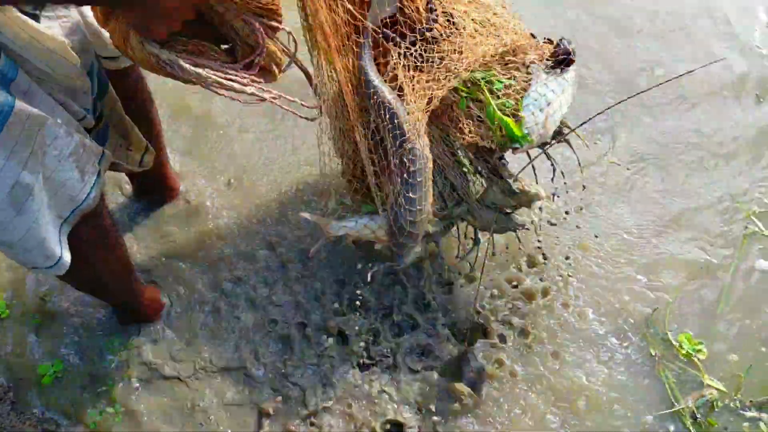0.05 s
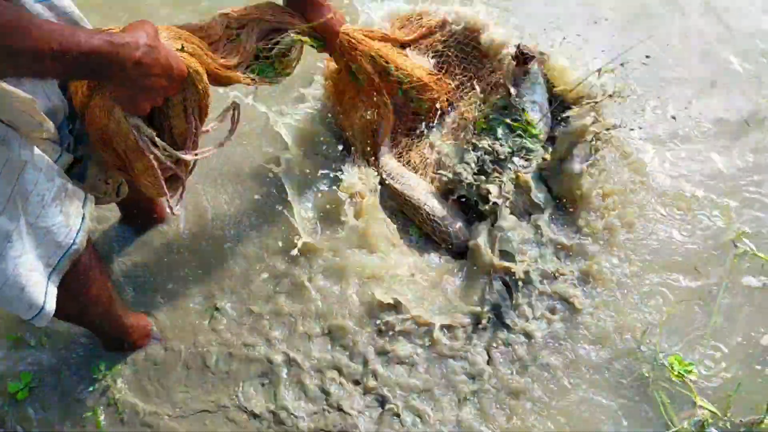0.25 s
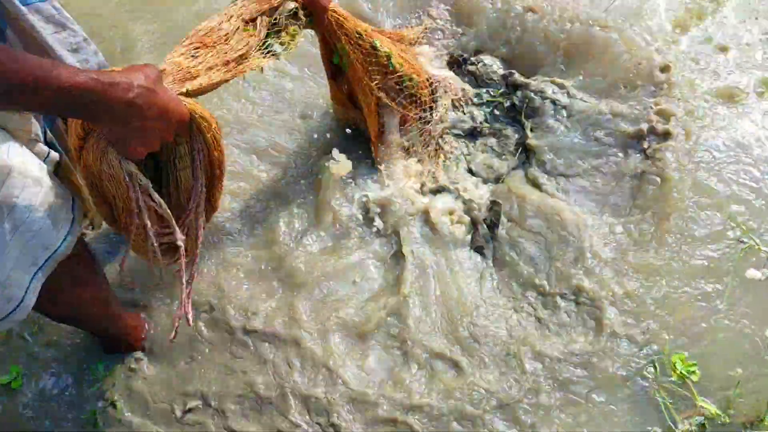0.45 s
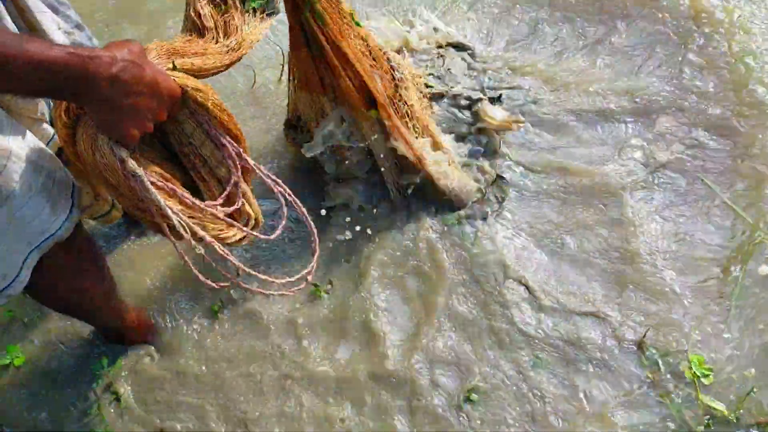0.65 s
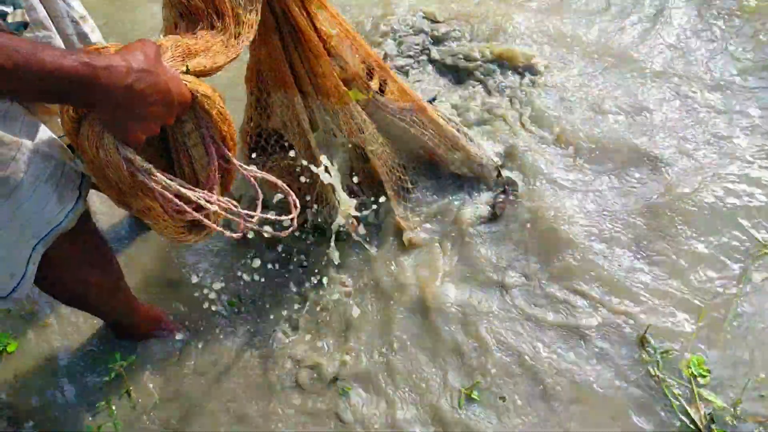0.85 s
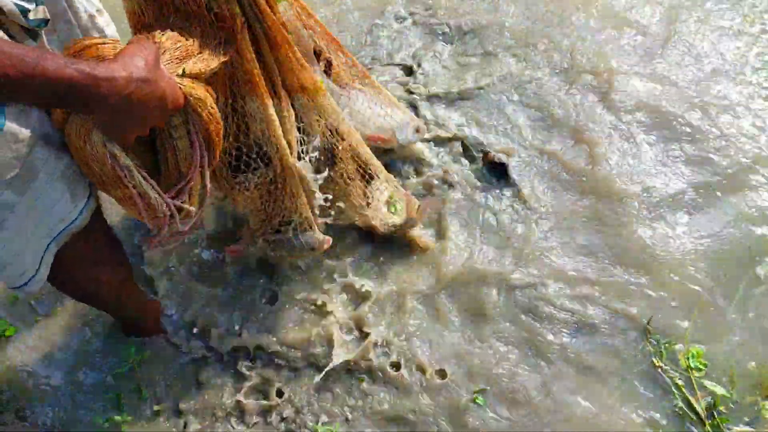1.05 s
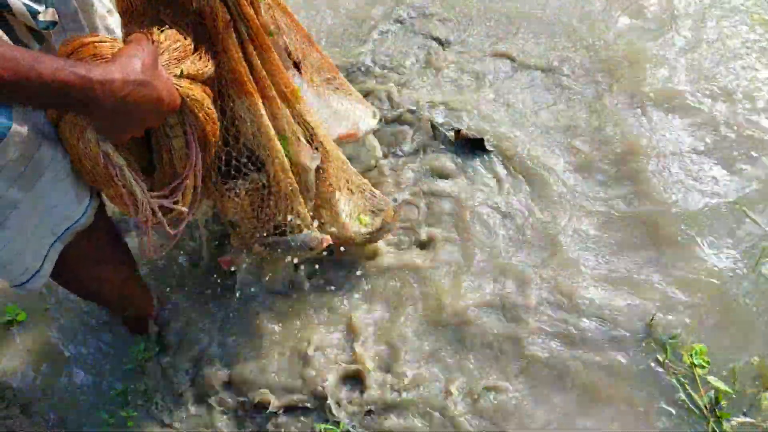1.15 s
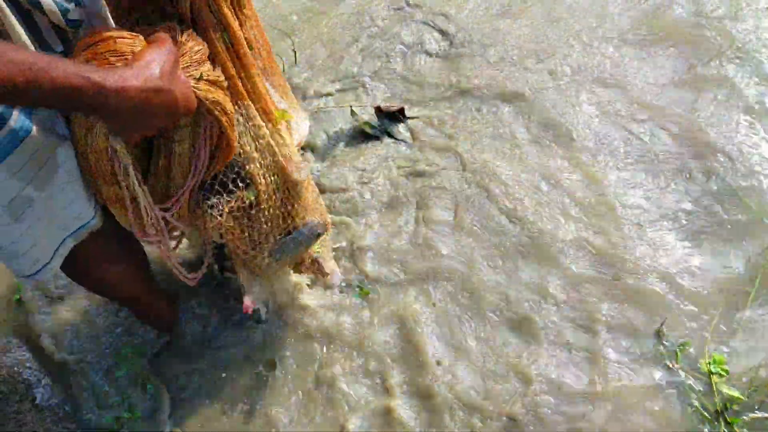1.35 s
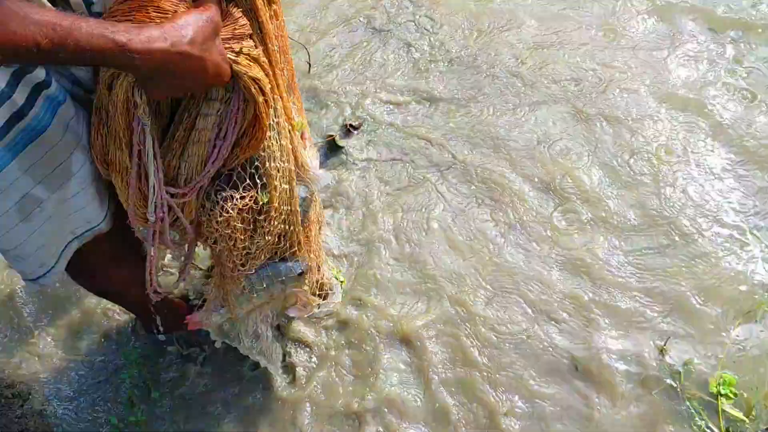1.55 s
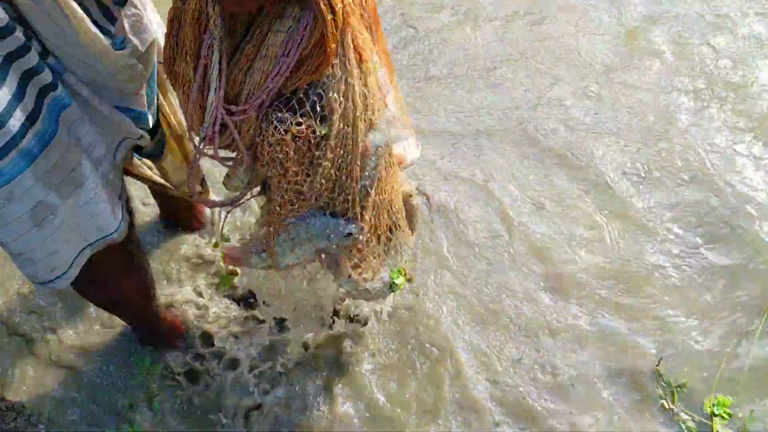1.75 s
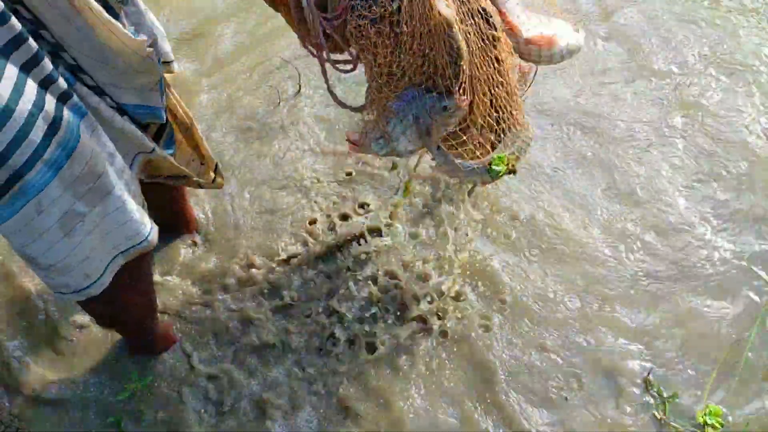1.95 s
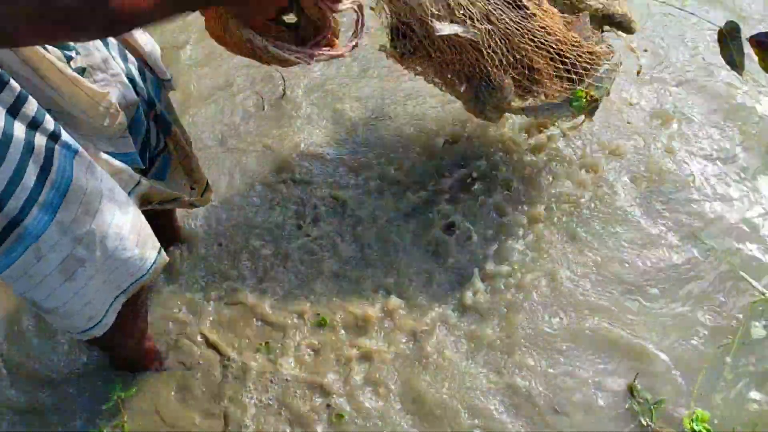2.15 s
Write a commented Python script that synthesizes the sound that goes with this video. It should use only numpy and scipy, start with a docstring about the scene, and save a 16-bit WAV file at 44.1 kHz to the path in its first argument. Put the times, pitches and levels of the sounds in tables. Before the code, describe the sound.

Water splashes as a bundled net is dunked into a muddy shallow, bubbling and plopping. A second slosh follows, then softer swishing and a light patter of drips as the net lifts out, close by outdoors.

```python
"""Dunking a fishing net

A bundled net is dunked in shallow muddy water, pushed down again, swished and lifted out dripping.
Each surge of water traps air bubbles that ring briefly, and throws a spray of tiny drops.
Single plops and sharp splats stand out, foam fizzes, and a thin hiss comes and goes as the net
drains. It all happens outdoors, close by."""
import sys
import numpy as np
from scipy import signal
from scipy.io import wavfile

SR = 44100
rng = np.random.default_rng(int(sys.argv[2]) if len(sys.argv) > 2 else 0)


def bounce(signal):
    """Save signal as a 16-bit WAV file at the path given by the first command-line argument."""
    frames = np.transpose(np.atleast_2d(signal))
    limited = np.clip(frames, -1, 1)
    pcm = np.round(limited * 32767).astype(np.int16)
    wavfile.write(sys.argv[1], SR, pcm)


N = 97020  # 2.2 seconds


def amp(db):
    """Turns decibels (dB) into a number to multiply a sound by."""
    return 10 ** (np.asarray(db) / 20)


def unit(x):
    """Scales a sound to an average power of 1."""
    return x / np.sqrt(np.mean(x ** 2) + 1e-20)


def add(mix, start_s, sound):
    """Adds a sound to the mix at the given time."""
    part = mix[max(round(start_s * SR), 0):][:len(sound)]
    part += sound[:len(part)]


def colour(x, tone, size=4096):
    """Makes some pitches louder and others softer, following rows of Hz and dB."""
    hz, db = np.transpose(tone)
    log_hz = np.log(abs(np.fft.fftfreq(size, 1 / SR)) + 1)
    log_gain = np.log(amp(np.interp(log_hz, np.log(hz), db)))
    response = np.exp(np.conj(signal.hilbert(log_gain)))  # rings after a click, never before it
    taps = np.fft.ifft(response).real[:size // 2]
    return signal.fftconvolve(x, taps)[:len(x)]


def evened(x, smooth_s=0.022):
    """Holds a sound's strength near 1 while keeping its fine crackle."""
    window = np.hanning(int(2 * smooth_s * SR))
    power = abs(signal.fftconvolve(x ** 2, window / window.sum(), "same"))
    return x / np.sqrt(power + 0.03 * np.median(power) + 1e-12)


def grains(level, per_s, spread_db, reference_db=-57.5):
    """Random clicks: per_s a second when the level is at reference_db, more in wilder water."""
    chance, size = rng.random(N), rng.exponential(1, N)
    rate = per_s * (level / amp(reference_db)) ** 0.32
    return (chance < rate / SR) * amp(spread_db * np.minimum(size, 4))


def crackle(level, tone, per_s, spread_db):
    """Random clicks, coloured and evened out; the level sets how crowded they are."""
    clicks = grains(level, per_s, spread_db) * rng.choice([-1, 1], N)
    return evened(colour(clicks, tone))


def bubble(hz, cycles, onset_cycles, glide):
    """One air bubble swells and rings away, rising in pitch as it nears the surface."""
    turns = np.arange(int(8 * cycles * SR / hz)) * hz / SR
    shape = (1 - np.exp(-(turns / onset_cycles) ** 2)) * np.exp(-turns / cycles)
    bend = 1 + glide * (turns / cycles / 2 - 0.5)
    return shape / shape.max() * np.sin(2 * np.pi * turns * bend)


def swarm(level, tone, range_hz, per_s, spread_db, cycles, kinds=128):
    """Many bubbles, each ringing at the pitch that its size gives it."""
    strengths = grains(level, per_s, spread_db)
    kind = rng.integers(0, kinds, N)
    pitches = np.geomspace(*range_hz, kinds) * rng.uniform(0.98, 1.02, kinds)
    ring_cycles = cycles * np.exp(0.18 * rng.standard_normal(kinds))
    rings = [bubble(hz, c, onset_cycles=0.63, glide=0.019) for hz, c in zip(pitches, ring_cycles)]
    out = np.zeros(N)
    for i in np.flatnonzero(strengths):
        add(out, i / SR, strengths[i] * rings[kind[i]])
    return level * evened(colour(out, tone))


def air():
    """Still outdoor air makes a very faint, steady noise."""
    # The air's tone. Each row: pitch in Hz, boost or cut in dB.
    tone = [(25, 1), (90, 0.5), (170, -9), (400, -15), (1000, -12.5), (2100, 5.5), (4500, -18.5),
            (9000, -13), (15500, -24.5)]
    return amp(-84.5) * unit(colour(rng.standard_normal(N), tone))


def echoes(x, fade_s=0.082, change_s=0.06, size=8192, count=3):
    """Short echoes off the water, the bank and the fisherman keep changing as the water moves."""
    t, out = np.arange(size) / SR, np.zeros(N)
    for k in range(count):
        bounces = rng.standard_normal(size) * (rng.random(size) < 2000 / SR)  # about 2000 a second
        bounces *= amp(-60 * t / fade_s)
        share = np.sqrt(2 / count) * np.cos(np.pi * (np.arange(N) / SR / change_s + k / count))
        out += signal.fftconvolve(x * share, bounces / np.linalg.norm(bounces))[:N]
    return out


def fizz():
    """Foam bursts on the wet net in a dense, quiet, very high fizz."""
    # How loud the foam is. Each row: time in seconds, level in dB.
    loudness = [(0, -86.5), (0.151, -70), (.55, -69), (.67, -107), (.74, -82), (.84, -72.5), (0.981, -100),
                (1.069, -80.5), (1.22, -83), (1.35, -73), (1.439, -101), (1.48, -75.5), (1.63, -93),
                (1.701, -72), (2.051, -65), (2.2, -78.5)]
    # The foam's tone. Each row: pitch in Hz, boost or cut in dB.
    tone = [(3000, -38), (6500, -19.5), (7600, -9.5), (8600, 1), (10000, -6), (12000, -3), (14300, -1.5),
            (15500, -4.5)]
    times, db = np.transpose(loudness)
    level = amp(np.interp(np.arange(N) / SR, times, db))
    return level * crackle(np.ones(N), tone, per_s=560, spread_db=5.5)


def churn():
    """Water pushed aside makes deep lumps of sound with no clear note."""
    # Swells of churning. Each row: start in seconds, length in seconds, level in dB.
    swells = [(.25, 0.17, -69), (0.396, 0.076, -59.5), (0.478, 0.078, -75.5), (0.619, .025, -75.5),
              (0.706, 0.033, -79.5)]
    # The churning's tone. Each row: pitch in Hz, boost or cut in dB.
    tone = [(25, -20.5), (80, -14.5), (150, -18.5), (240, -12), (340, -8), (450, -5.5), (600, -2),
            (1200, -27)]
    t, level = np.arange(N) / SR, np.zeros(N)
    for start, length, db in swells:
        progress = np.clip((t - start) / length, 0, 1)
        level += amp(db) * abs(np.sin(np.pi * progress))
    return level * crackle(np.ones(N), tone, per_s=83, spread_db=1)


def hiss(width_hz=650):
    """A thin hiss wanders in pitch and swells as the net leaves the water."""
    # The path of the hiss. Each row: time in seconds, middle pitch in Hz, level in dB.
    path = [(.63, 6200, -100), (.685, 5920, -69.5), (0.721, 6220, -100), (1.345, 5820, -105),
            (1.367, 5780, -67), (1.431, 5930, -81.5), (1.489, 6050, -68.5), (1.575, 6080, -95.5),
            (1.60, 6000, -68), (1.64, 6200, -73.5), (1.663, 6397, -56), (1.71, 6240, -52),
            (1.801, 6220, -60.5), (1.991, 6170, -64.5), (2.079, 6250, -94)]
    times, hz, db = np.transpose(path)
    t = np.arange(N) / SR
    low_pass = signal.butter(3, width_hz / 2, fs=SR, output="sos")
    noise = signal.sosfilt(low_pass, rng.standard_normal((2, N)))
    phase = 2 * np.pi * np.cumsum(np.interp(t, times, hz)) / SR
    band = noise[0] * np.cos(phase) + noise[1] * np.sin(phase)  # moves the low noise up to that pitch
    return amp(np.interp(t, times, db)) * unit(band)


def surge_levels():
    """Each surge of water rises, holds and fades, driving three sizes of bubble and the spray."""
    # Surges of water. Each row: start, rise and hold in seconds, fade in dB a second,
    # then levels in dB for big bubbles, small bubbles, fine bubbles and spray.
    # The net hits at 0.24 s, the hollow closes at 0.4 s, a second push comes at 0.72 s,
    # the net swishes at 1.25 s and lifts clear at 1.65 s.
    surges = [ (.0, 0.0024, 0.28, 206, -87.5, -75.5, -72, -75),
              (0.109, 0.002, 0.0027, 369, -79, -55.5, -56, -58),
              (0.21, 0.0056, 0.0094, 306, -82, -50.5, -46, -49),
              (0.239, 0.021, 0.034, 141.5, -36.5, -30.5, -36, -39.5),
              (0.398, 0.0034, 0.071, 194, -46, -43.5, -52.5, -66),
              (0.494, 0.0035, 0.017, 134.5, -69, -45.5, -54, -63.5),
              (0.644, 0.016, 0.016, 312, -64, -61, -87.5, -100),
              (0.693, 0.012, 0.0067, 214, -62.5, -43.5, -57, -72),
              (0.716, 0.022, 0.06, 206.5, -54.5, -43.5, -55, -70.5),
              (0.91, 0.0024, 0.0015, 404, -67, -55, -74.5, -84.5),
              (0.993, 0.014, 0.044, 164, -84.5, -78.5, -95.5, -108.5),
              (1.056, 0.0037, .11, 70.5, -70, -65.5, -83, -75),
              (1.109, 0.0031, 0.0089, 263, -93, -56.5, -65, -56.5),
              (1.245, 0.014, 0.061, 157, -74.5, -64, -115, -83),
              (1.362, 0.018, 0.02, 121.5, -75, -62.5, -88, -117.5),
              (1.486, .005, 0.011, 70.5, -79.5, -70, -81.5, -77),
              (1.577, 0.027, 0.026, 102.5, -95.5, -83, -76, -83.5),
              (1.653, 0.054, 0.029, 110, -102.5, -74, -73, -57.5),
              (1.740, 0.033, 0.11, 129.5, -78.5, -62.5, -64.5, -60),
              (1.96, 0.0073, 0.028, 85.5, -83, -64, -67.5, -58),
              (2.129, 0.0027, 0.025, 197, -100, -79, -66, -69)]
    t, levels = np.arange(N) / SR, np.zeros((4, N))
    slowness = np.array([1.88, 1, 1, 1])[:, None]  # big bubbles take longer to build up
    for start, rise, hold, fade, *dbs in surges:
        swell = np.clip((t - start) / (rise * slowness), 0, 1) ** slowness
        shape = swell * amp(-fade * np.maximum(t - start - rise - hold, 0))
        levels += (amp(dbs)[:, None] * shape) ** 2
    return np.sqrt(levels)


def spray(level):
    """Tiny drops tick on the water and ring at many high pitches."""
    # The spray's tone. Each row: pitch in Hz, boost or cut in dB.
    tone = [(300, -40.5), (1500, -20.5), (3700, -9), (4600, -21.5), (6100, -7.5), (7300, -10.5),
            (7900, -10.5), (8450, 2), (9100, -1), (9800, -2), (10800, -6), (12000, -11.5), (14000, -8),
            (15500, -9.5)]
    ticks = level * crackle(level, tone, per_s=1700, spread_db=0.5)
    rings = swarm(level, tone, (4940, 14370), per_s=1100, spread_db=1.5, cycles=15)
    return amp(-4.5) * ticks + rings


def splats(rise_s=0.001, decay_s=0.002, size=1024):
    """Large drops land flat and burst into a brief crack of spray."""
    # Drops landing. Each row: start in seconds, peak level in dB.
    landings = [(0.221, -32), (0.263, -21), (0.343, -51), (.521, -44.5), (.791, -36.5), (1.012, -71),
                (1.583, -55), (1.697, -41), (1.789, -33), (1.903, -43), (1.9979, -31.5), (2.036, -37.5),
                (2.098, -41.5)]
    # A splat's tone. Each row: pitch in Hz, boost or cut in dB.
    tone = [(500, -39), (2500, -20.5), (4000, -15.5), (6200, -8), (7400, -26.5), (8600, 12.5), (9600, -0.5),
            (11000, -10), (15500, -8)]
    t, out = np.arange(size) / SR, np.zeros(N)
    shape = (1 - np.exp(-(t / rise_s) ** 2)) * np.exp(-t / decay_s)
    for start, db in landings:
        crack = colour(rng.standard_normal(size) * shape, tone)
        add(out, start, amp(db) * crack / abs(crack).max())
    return out


def bubbling(big, small, fine):
    """Air trapped by the surges rings in three swarms: the smaller the bubbles, the higher the pitch."""
    # The tones of the three swarms. Each row: pitch in Hz, boost or cut in dB.
    big_tone = [(60, -38.5), (180, -39), (260, -24), (400, -14.5), (500, -15.5), (610, -4), (780, -5),
                (950, 5.5), (1160, 10), (1450, 7), (2200, -13), (4000, -42)]
    small_tone = [(300, -41.5), (900, -10), (1400, -9), (1700, -6.5), (2000, 3), (2300, 3.5), (2600, -2),
                  (2850, -8), (3200, -18.5), (4400, -28), (9000, -50.5)]
    fine_tone = [(500, -38.5), (2000, -11), (2800, -3), (3700, -2), (4400, -13), (5500, -12.5), (9000, -31)]
    return (swarm(big, big_tone, (473.6, 1483), per_s=1100, spread_db=4.5, cycles=2.9)
            + swarm(small, small_tone, (1388, 2840), per_s=1100, spread_db=3.5, cycles=5)
            + swarm(fine, fine_tone, (2627, 5420), per_s=920, spread_db=3, cycles=7.2))


def plops(low_cut_hz=500):
    """Single bubbles ring loudly enough to stand out from the swarms."""
    # Single bubbles. Each row: start in seconds, peak in dB before the bass is cut, pitch in Hz.
    loud_bubbles = [(0.011, -45.5, 2164), (.059, -50, 2080), (0.078, -48.5, 2090), (.115, -58.5, 863),
                    (.118, -42.5, 2175), (0.123, -48.5, 1345), (0.206, -52.5, 1260), (.213, -29, 2510),
                    (.237, -30, 2460), (.254, -26.5, 2000), (.275, -22.5, 2226), (.284, -25, 1984),
                    (0.295, -31, 1196), (.304, -53, 2390), (.316, -19.5, 1940), (.339, -25.5, 2430),
                    (.408, -27.5, 2024), (.409, -35.5, 1060), (.456, -36, 1205), (0.551, -40, 3300),
                    (.625, -42.5, 2360), (0.702, -30.5, 2034), (.733, -25.5, 1980), (0.735, -28.5, 2610),
                    (0.762, -31, 1490), (.781, -40, 954), (.782, -59, 2100), (.789, -31, 2014),
                    (0.92, -42, 1890), (0.98, -61.5, 1747), (1.064, -66.5, 616), (1.077, -48, 1920),
                    (1.129, -47.5, 3040), (1.150, -68, 580), (1.18, -59.5, 1226), (1.244, -48.5, 2140),
                    (1.272, -45.5, 1890), (1.295, -46, 2080), (1.316, -45.5, 2040), (1.346, -37.5, 2058),
                    (1.431, -61, 1204), (1.490, -52.5, 1840), (1.612, -65, 2700), (1.746, -45, 2210),
                    (1.772, -45, 1897), (1.814, -52, 1124), (1.821, -47, 1496), (1.840, -64, 3040),
                    (1.858, -47.5, 2080), (1.873, -45.5, 1890), (1.913, -58, 1250), (1.945, -63, 980),
                    (1.984, -41.5, 2266), (2.008, -60, 855), (2.02, -50.5, 1267), (2.035, -42.5, 2446),
                    (2.076, -59.5, 1645), (2.143, -46, 3410), (2.161, -51, 2650)]
    out = np.zeros(N)
    for start, db, hz in loud_bubbles:
        add(out, start, amp(db) * bubble(hz, cycles=5, onset_cycles=1.8, glide=0.03))
    return signal.sosfilt(signal.butter(2, low_cut_hz, "high", fs=SR, output="sos"), out)


def scene():
    """Mixes the water sounds, their echoes and the open air into one channel."""
    big, small, fine, drops = surge_levels()
    water = bubbling(big, small, fine) + spray(drops) + churn() + plops() + splats() + hiss() + fizz()
    return (water + amp(-7) * echoes(water) + air())[None]


def record(dry):
    """Cuts away the highest treble, above 15600 Hz."""
    low_pass = signal.firwin(511, 15600, window=("kaiser", 9), fs=SR)
    return signal.oaconvolve(dry, low_pass[None], "same")


dry = scene()
out = record(dry)
bounce(out)
```